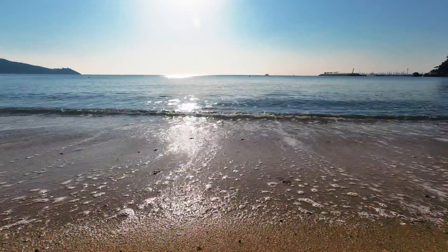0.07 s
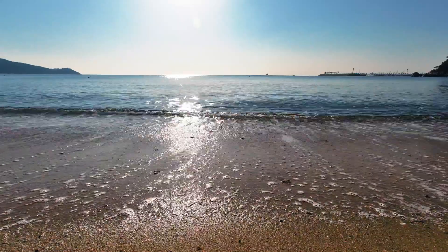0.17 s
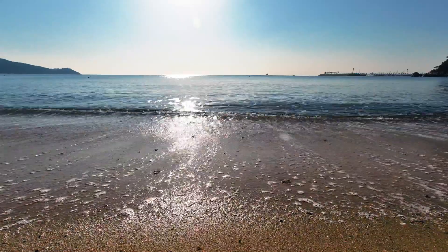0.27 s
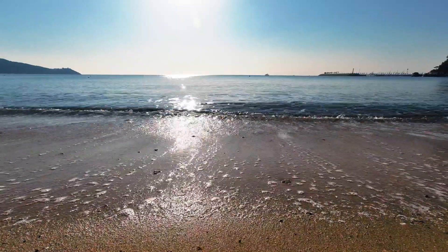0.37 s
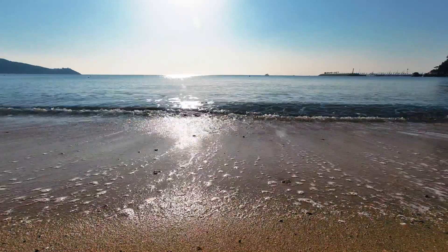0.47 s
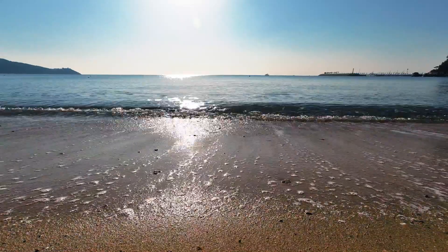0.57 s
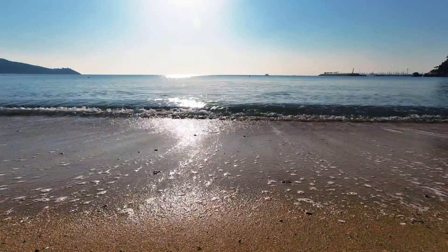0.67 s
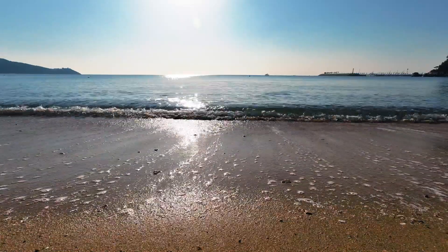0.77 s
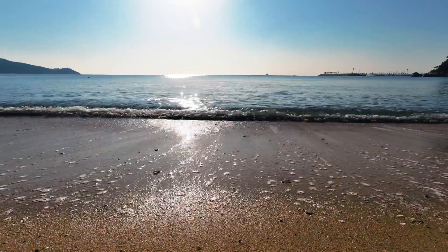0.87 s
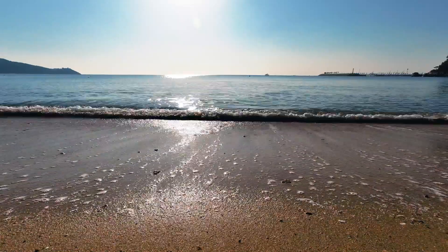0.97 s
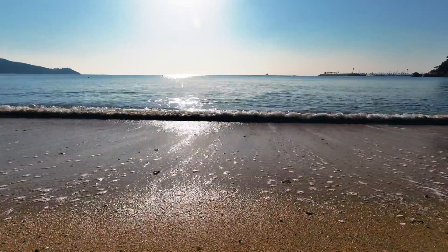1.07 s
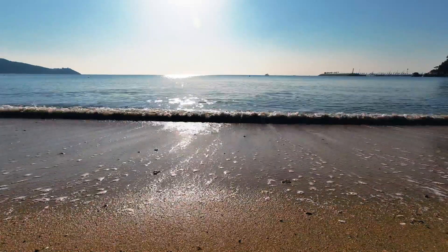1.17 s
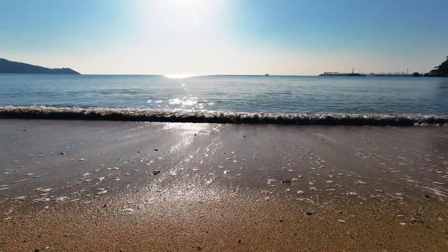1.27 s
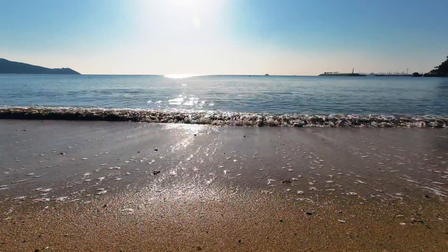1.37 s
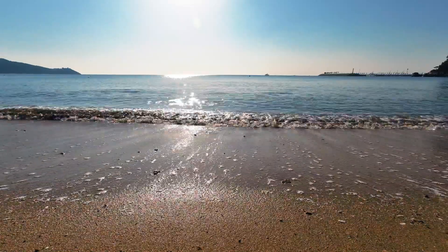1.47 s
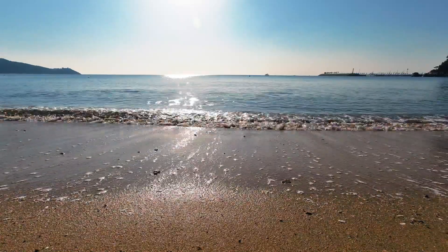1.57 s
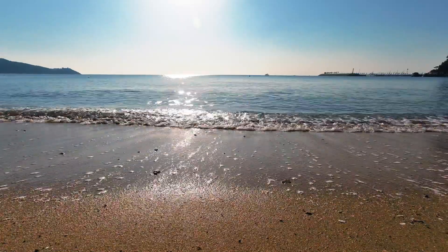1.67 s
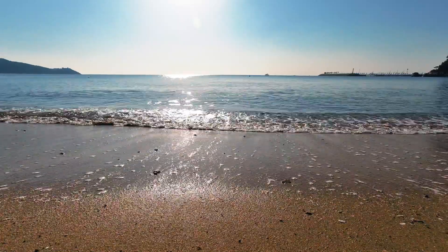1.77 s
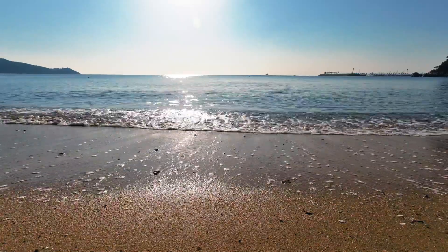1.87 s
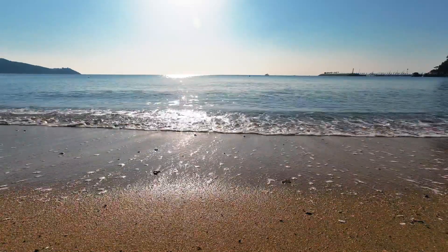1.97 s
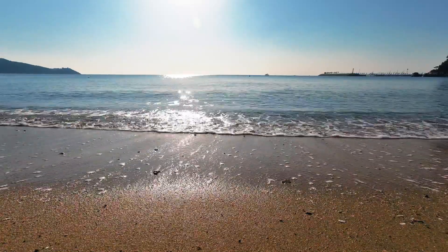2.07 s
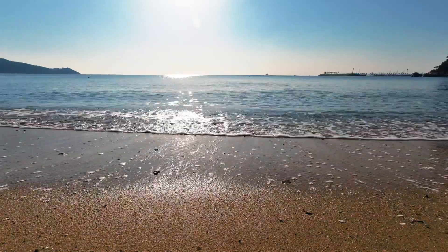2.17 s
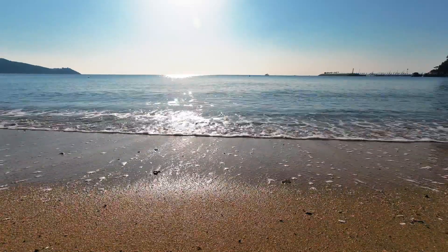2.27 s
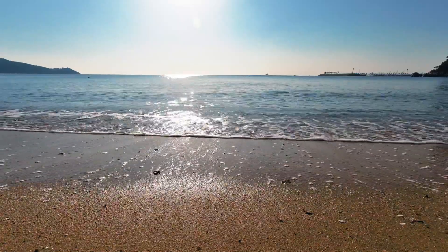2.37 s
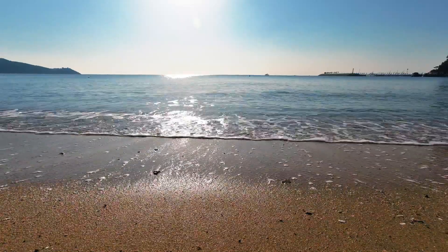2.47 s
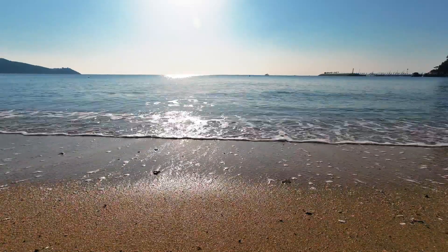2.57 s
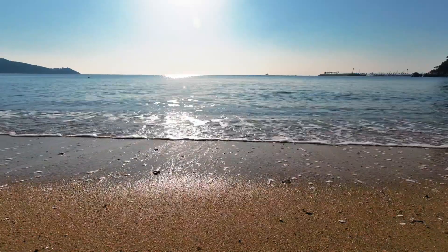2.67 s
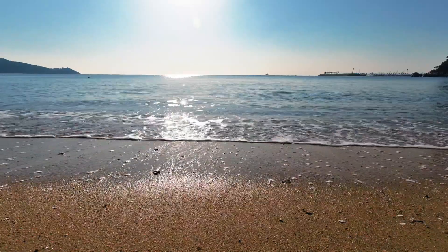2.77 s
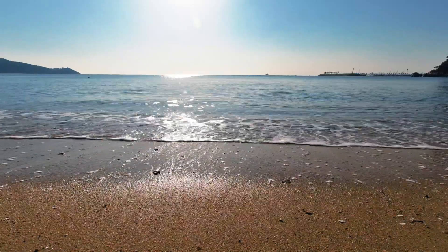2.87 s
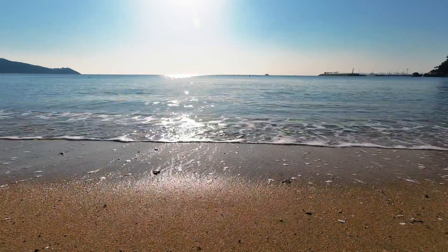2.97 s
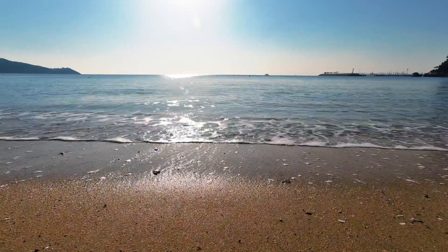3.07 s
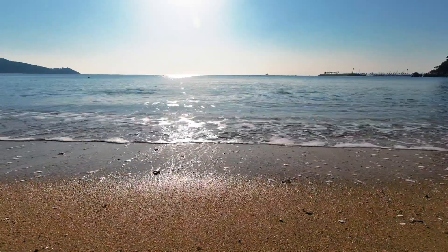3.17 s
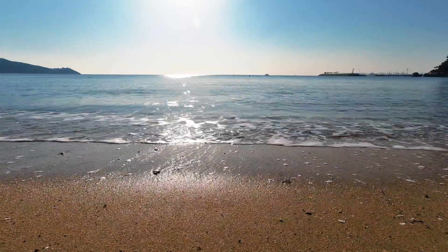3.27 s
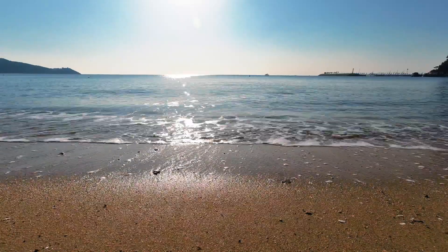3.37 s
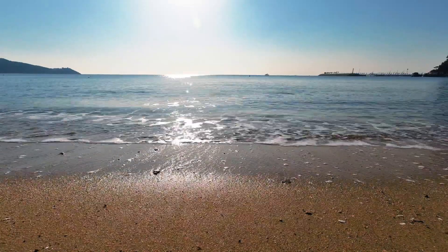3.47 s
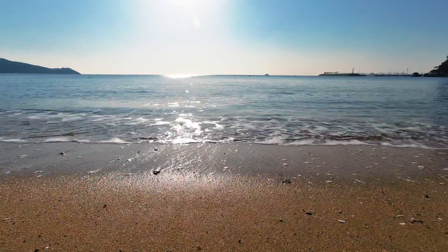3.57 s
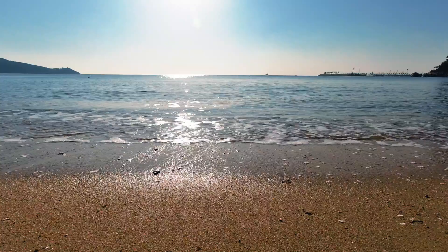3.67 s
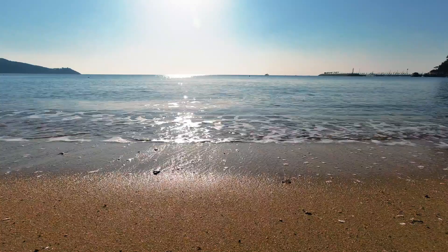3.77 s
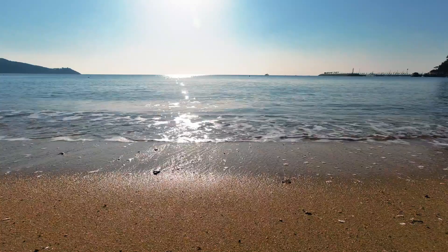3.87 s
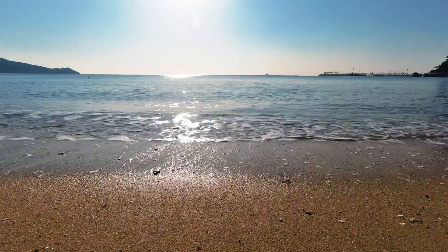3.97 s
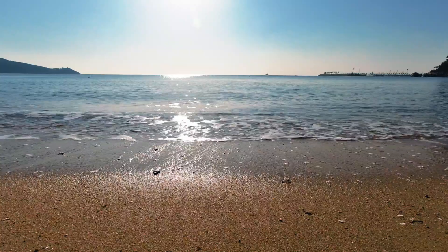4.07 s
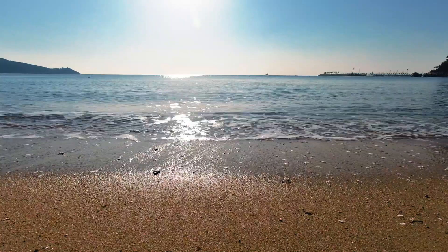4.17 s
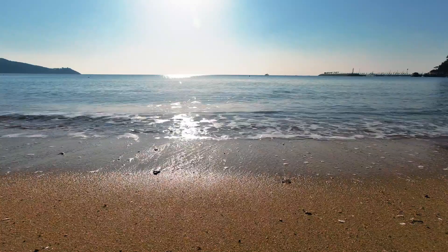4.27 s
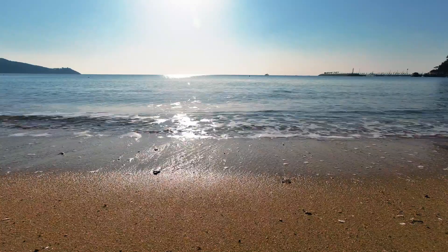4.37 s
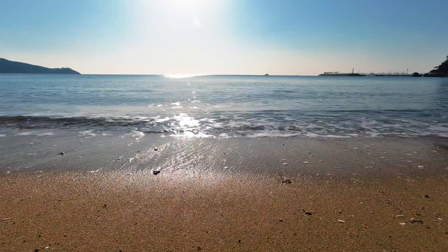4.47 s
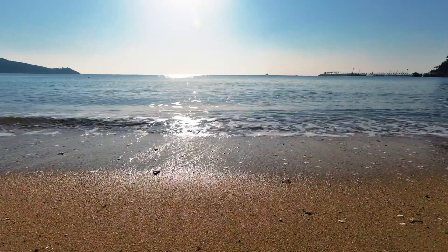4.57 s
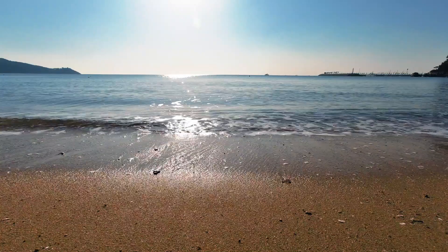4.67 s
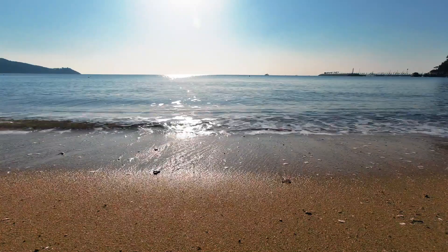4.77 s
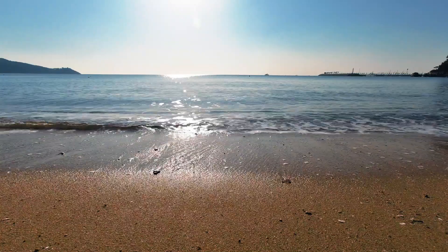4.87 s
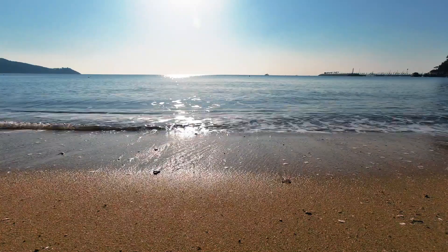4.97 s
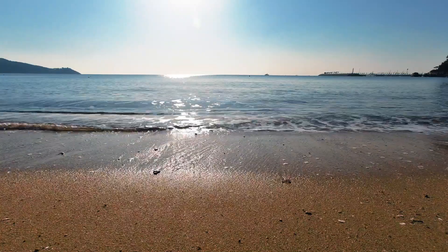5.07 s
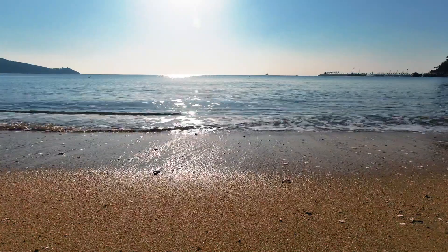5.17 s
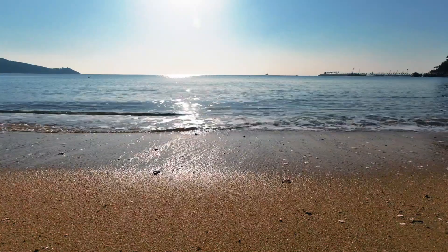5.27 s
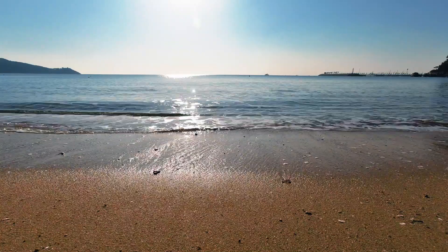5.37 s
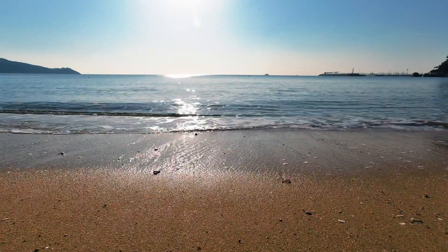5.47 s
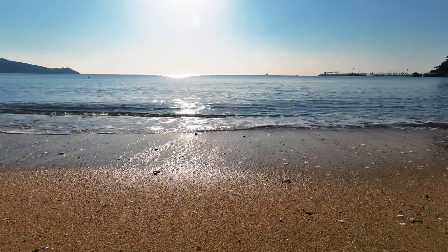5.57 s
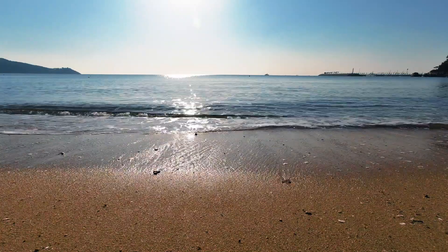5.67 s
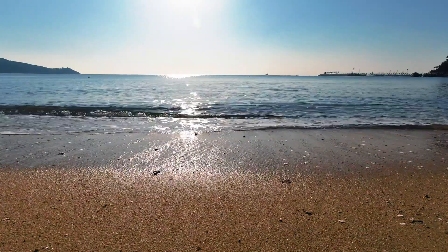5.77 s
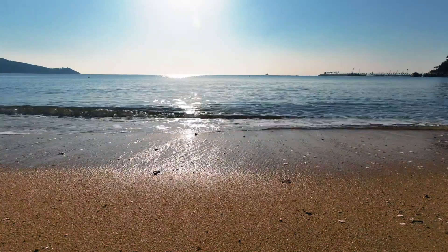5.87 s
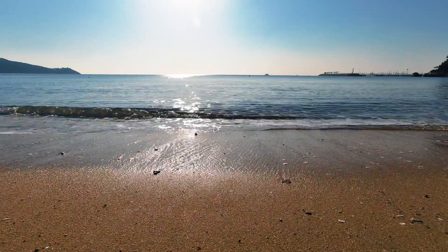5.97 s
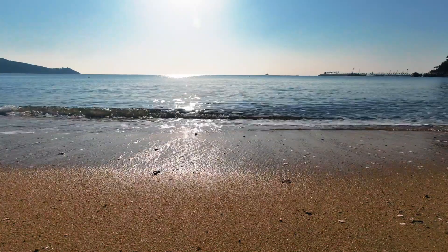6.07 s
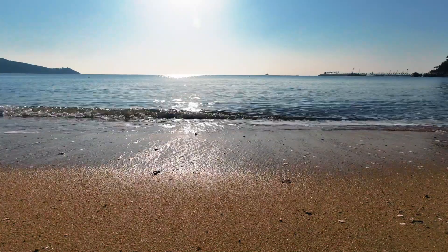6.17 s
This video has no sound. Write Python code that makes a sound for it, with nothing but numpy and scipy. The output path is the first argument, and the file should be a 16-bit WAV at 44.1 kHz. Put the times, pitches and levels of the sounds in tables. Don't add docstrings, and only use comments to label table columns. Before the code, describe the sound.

Small foaming wave breaks on a sandy shore in front, fades into a long quiet lull, then gurgling wavelets slap left, right and ahead.

```python
import sys
import numpy as np
from scipy import signal
from scipy.fft import rfft, irfft, next_fast_len
from scipy.io import wavfile
from scipy.ndimage import uniform_filter1d

SR = 44100
rng = np.random.default_rng(int(sys.argv[2]) if len(sys.argv) > 2 else 0)


def decibels_to_gain(level_db):
    exponent = np.asarray(level_db, float) / 20
    return 10 ** exponent


def master_out(mix):
    frames = np.transpose(np.atleast_2d(mix))
    ceiling = np.clip(frames, -1, 1)
    pcm = np.round(ceiling * 32767).astype(np.int16)
    wavfile.write(sys.argv[1], SR, pcm)


N = 274743
PORT_GAP_S = 8 / SR
FRAME, HOP = 512, 128
CELLS = np.radians(np.linspace(-90, 90, 13))


def evened(x):
    return x / np.sqrt(np.mean(abs(x) ** 2) + 1e-20)


def smoothed(x, across, along):
    return uniform_filter1d(uniform_filter1d(x, size=across, axis=0), size=along, axis=1)


def power_db(power):
    return 10 * np.log10(abs(power) + 1e-20)


def summed(*db):
    return 10 * np.log10(sum(decibels_to_gain(v) ** 2 for v in db))


def read(points, hz):
    f, value = np.transpose(points)
    return np.interp(np.log(hz + 1), np.log(f + 1), value, -120, -120)


def colour(points, hz):
    return evened(decibels_to_gain(read(points, hz)))[:, None]


def columns(rows, t):
    s, *values = np.transpose(rows)
    return [np.interp(t, s, v) for v in values]


def add(mix, s, sound):
    part = mix[:, round(s * SR):][:, :len(sound[0])]
    part += sound[:, :part.shape[1]]


def foam(pops_per_s, size_db, share):
    shape = (len(CELLS), N + FRAME)
    pops = rng.choice([-1., 1.], shape) * (rng.random(shape) < pops_per_s / SR)
    pops = pops * decibels_to_gain(size_db * np.minimum(rng.exponential(1, shape), 4))
    hiss = rng.standard_normal(shape)
    white = np.sqrt(1 - share) * hiss + np.sqrt(share) * evened(pops)
    return signal.stft(white, SR, nperseg=FRAME, noverlap=FRAME - HOP)


def ports(hz, z, weight):
    lead_s = PORT_GAP_S * np.sin(CELLS)[:, None, None]
    lead = np.exp(1j * np.pi * hz[None, :, None] * lead_s)
    z = z * np.sqrt(weight / weight.sum(0))[:, None, :]
    return np.array([(z * lead).sum(0), (z / lead).sum(0)])


def sound_of(z):
    return signal.istft(z, SR, nperseg=FRAME, noverlap=FRAME - HOP)[1][:, :N]


def churn(t, slap_db=0):
    # time_s, level_db
    surf = [(0, -34.5), (.15, -31), (.55, -24), (.68, -23.5), (.92, -20), (1.2, -21), (1.62, -24.5),
            (1.8, -29.5), (2.15, -46.5), (2.95, -56), (3.83, -46), (4.1, -48), (4.93, -38), (5.27, -25.5),
            (5.46, -25), (5.68, -34.5), (5.84, -25.5), (6.23, -25)]
    # peak_s, level_db
    slap_events = [
        (1.393, -19),
        (4.646, -33),
        (5.09, -29),
        (5.722, -25.5),
    ]
    lull_db = -61.5
    rise_s, fall_db_per_s = .008, 60
    slaps = []
    for s, db in slap_events:
        rise_db = 40 * np.maximum(s - t, 0) / rise_s
        fall_db = fall_db_per_s * np.maximum(t - s, 0)
        slaps.append(db + slap_db - rise_db - fall_db)
    return summed(columns(surf, t)[0], lull_db, *slaps)


def stage(t):
    # start_s, bearing_deg (left positive), spread_deg,
    # fizz_db and thud_db (both against the churn)
    stages = [(0, 7.5, 33, -2.5, -13.5), (.6, 6, 22.2, -0.5, -16.5), (1.0, -1.5, 29, -0.5, -10.5),
              (1.34, 6.5, 16.7, 2, -6.5), (1.8, -5, 28, -2, -8), (2.15, 24, 35, 2, -2),
              (2.8, 24, 100, 1.5, 1), (3.38, 81, 40, -2.5, -3.5), (4.27, 66.5, 21, 0.5, -2.5),
              (4.6, 79, 39, -1, -5.5), (4.902, -35.5, 16, 2, -15.5), (5.12, -33, 13.8, -1.5, -14),
              (5.56, -35.5, 10.4, 2, -5), (5.758, 25, 29, -2, -8.5)]
    handover_s = .05
    rows = np.array(stages, float)
    ends = np.append(rows[1:, 0], N / SR)
    s = np.column_stack([rows[:, 0] + handover_s, ends - handover_s]).ravel()
    return columns(np.column_stack([s, np.repeat(rows[:, 1:], 2, axis=0)]), t)


def spray(t, churn_db):
    # peak_s, level_db, hold_s
    throws = [
        (.9, -48.5, 0.11),
        (1.043, -40.5, .2),
        (1.292, -32, 0.34),
        (4.6, -73, 0.18),
        (5.52, -67.5, .04),
        (5.634, -81, .02),
        (5.9, -63, 0.022),
        (6.08, -63, .13),
    ]
    rise_db_per_s, fall_db_per_s = 112, 109.5
    mist_db = -69 - 5.0 * np.maximum(churn_db + 30, 0)
    bursts = []
    for s, db, hold in throws:
        rise_db = rise_db_per_s * np.maximum(s - t, 0)
        fall_db = fall_db_per_s * np.maximum(t - s - hold, 0)
        bursts.append(db - rise_db - fall_db)
    return summed(mist_db, *bursts)


def crest():
    # pitch_hz, density_db (dB per Hz)
    thud_shape = [(60, -10.5), (110, 6.5), (160, 0.5), (240, -2), (330, 0), (480, -27)]
    churn_shape = [(170, -27), (260, -1), (400, 4.5), (800, 4.5), (1300, -2), (1800, -61), (2600, -25)]
    fizz_shape = [(900, -1), (1400, 6), (2000, 4), (3000, -0.5), (4200, -2.5), (5000, -11.5), (5700, -17.5),
                  (6300, -17), (6750, -38.5)]
    spray_shape = [(4200, -12.5), (5200, 0.5), (6500, 2), (7200, 3), (8500, 2.5), (9000, -0.5),
                   (9400, -1.5), (9900, -1.5), (10800, 0.5), (11700, -3.5), (12200, -57)]
    undertow_db = -56
    slap_fizz_db = -7.5
    ragged_db = 11

    hz, t, z = foam(pops_per_s=250, size_db=3.0, share=0.19)
    churn_db = churn(t)
    bearing, spread, fizz_db, thud_db = stage(t)
    bearing, spread = np.radians(bearing), np.radians(spread)
    spray_db = spray(t, churn_db)
    off_centre = (CELLS[:, None] - bearing) / np.maximum(spread, .1)
    weight = np.exp(-.5 * off_centre ** 2) + 1e-4

    layers = ((thud_shape, summed(churn_db + thud_db, undertow_db)),
              (churn_shape, churn_db),
              (fizz_shape, churn(t, slap_fizz_db) + fizz_db),
              (spray_shape, spray_db))
    power = sum((colour(shape, hz) * decibels_to_gain(db)) ** 2 for shape, db in layers)

    faint_db = np.clip(-48 - spray_db, 0, 40)
    octaves_up = np.log2(np.maximum(hz, 7600) / 7600)[:, None]
    power = power * decibels_to_gain(-.35 * faint_db * octaves_up) ** 2

    patches = rng.standard_normal((len(t), len(hz))).T
    patches = evened(smoothed(patches, across=6, along=14))
    flicker = evened(uniform_filter1d(rng.standard_normal(len(t)), size=5))
    torn = rng.standard_normal((len(t), len(hz))).T
    torn = evened(smoothed(torn, across=9, along=45))
    thin = np.clip((churn_db + 36) / 8, 0, 1) * np.clip((-33 - spray_db) / 8, 0, 1)
    treble = (hz > 6000)[:, None]
    power = power * decibels_to_gain(ragged_db * thin * np.minimum(torn - .4, 0) * treble) ** 2
    drift = decibels_to_gain(1.73 * patches + 0.5 * flicker)
    return sound_of(ports(hz, z, weight) * np.sqrt(power) * drift)


def sea():
    # pitch_hz, density_db (dB per Hz)
    sea_shape = [(15, -29.5), (28, -2.5), (45, 0), (85, -2.5), (130, -8.5), (180, -11.5), (300, -44),
                 (1000, -59.5), (4000, -32.5), (5500, -46), (6200, -56), (7000, -54.5)]
    hz, t, z = foam(pops_per_s=430, size_db=3.0, share=.1)
    around = ports(hz, z, np.ones((len(CELLS), len(t))))
    both = around + .5 * z[:2] / (1 + (hz[:, None] / 60) ** 2)
    n = next_fast_len(N)
    shape = evened(decibels_to_gain(read(sea_shape, np.fft.rfftfreq(n, 1 / SR))))
    return decibels_to_gain(-41.5) * irfft(rfft(sound_of(both), n) * shape, n)[:, :N]


def bubble(s, db, hz, cycles, rise):
    t = np.arange(round(.08 * SR)) / SR
    lead = PORT_GAP_S / 2 * np.sin(np.radians(stage(s)[0]))
    u = np.maximum(t + np.array([[lead], [-lead]]) - PORT_GAP_S, 0) * hz
    swell_and_decay = (1 - np.exp(-u / 1.38)) * np.exp(-u / cycles)
    return decibels_to_gain(db) * swell_and_decay * np.sin(2 * np.pi * u * (1 + rise * u))


def pockets():
    # start_s, peak_db, pitch_hz
    bursts = [(0.989, -1, 780), (1.399, -15, 187), (1.424, -11, 160.5), (1.589, -4, 544),
              (3.54, -32.5, 460), (3.769, -29.5, 373), (3.812, -24.5, 595), (4.647, -15.5, 358),
              (4.657, -18, 416), (4.674, -19.5, 227), (5.092, -17.5, 215), (5.152, -14.5, 370),
              (5.244, -12.5, 456), (5.284, -10, 337), (5.309, -15, 735), (5.379, -15.5, 221),
              (5.419, -15, 240), (5.725, -10, 415), (5.949, -30, 272.7), (6.023, -11.5, 435.3),
              (6.199, -14, 262)]
    mix = np.zeros((2, N))
    for (s, db, hz), chance in zip(bursts, rng.random((len(bursts), 2, 2))):
        add(mix, s, bubble(s, db + 1.5, hz, cycles=2.2, rise=.03))
        for late, pitch in chance:
            fragment = bubble(s, db - 4.0, hz * (.6 + 1.1 * pitch), cycles=2.1, rise=0.027)
            add(mix, s + .012 + 0.029 * late, fragment)
    for when, pitch, size in rng.random((900, 3)):
        s = when * N / SR
        db = churn(s) + 1.1 + 4 * size - 6 * pitch
        add(mix, s, bubble(s, db, 200 * 9 ** pitch, cycles=2.76, rise=0.0259))
    return mix


def scene():
    return crest() + sea() + pockets()


def masking_gate(x, band, size):
    # pitch_hz, threshold_db (against the churn)
    under_churn = [(20, -60), (3000, -50), (4200, -24), (5600, -26.5), (6600, -31.5), (6900, -81.5),
                   (13000, -68)]
    # pitch_hz, threshold_db (against the other)
    under_other = [(20, -29), (600, -14.5), (1500, -14), (2600, -6), (3400, -10), (4500, -4.5),
                   (6000, -1.5), (7000, -5), (13000, -16)]
    # pitch_hz, threshold_db (against the band's own slow level)
    under_own = [(20, -40), (4500, -30), (6000, -4), (7500, -2), (8500, -2), (9400, 1), (10200, -1),
                 (13000, 0)]

    pair = np.array([x[0] + x[1], x[0] - x[1]]) / 2
    hz, t, z = signal.stft(pair, SR, "cosine", nperseg=size, noverlap=size // 2)
    power = abs(z) ** 2
    starts = np.arange(0, len(hz), band)
    of_bin = np.arange(len(hz)) // band
    level = (np.add.reduceat(power, starts, 1) / band)[:, of_bin]
    churn_power = uniform_filter1d(power[0, (hz > 300) & (hz < 1400)].mean(0), size=3)

    waver = rng.standard_normal((len(t), 2, len(starts) + 1)).transpose(1, 2, 0)
    waver = evened(uniform_filter1d(waver, size=3, axis=2))
    waver_db = 3.1 * waver[:, of_bin] + 1.0 * waver[:1, -1:]

    own_db = power_db(smoothed(power.mean(0), across=61, along=5))
    relief_db = .42 * np.maximum(own_db + 97, 0)
    churn_trim_db = np.array([1.5, -7.0])[:, None, None]
    other_trim_db = np.array([1.5, -8.0])[:, None, None]
    by_churn = churn_power * decibels_to_gain(read(under_churn, hz)[:, None] + churn_trim_db) ** 2
    by_other = level[::-1] * decibels_to_gain(read(under_other, hz)[:, None] + other_trim_db) ** 2
    by_own = decibels_to_gain(read(under_own, hz)[:, None] + own_db - relief_db) ** 2

    strain_db = 0.13 * (power_db(churn_power) + 52) * np.clip(hz / 4000, 0, 1)[:, None]
    lasting = smoothed(waver.mean(0), across=3, along=8)
    by_own = by_own * decibels_to_gain(2.6 * evened(lasting)[of_bin]) ** 2
    mask = np.maximum(np.maximum(by_churn, by_other) * decibels_to_gain(strain_db) ** 2, by_own)
    mask = mask * decibels_to_gain(waver_db) ** 2
    z = z * (level > mask) * (power > mask * decibels_to_gain(1.5) ** 2)
    total, difference = signal.istft(z, SR, "cosine", nperseg=size, noverlap=size // 2)[1][:, :N]
    return np.array([total + difference, total - difference])


def top_cut(x):
    return signal.sosfilt(signal.butter(12, 12340, fs=SR, output="sos"), x)


def record(dry):
    mix = masking_gate(dry, band=8, size=1536)
    return top_cut(mix)


dry = scene()
out = record(dry)
master_out(out)
```